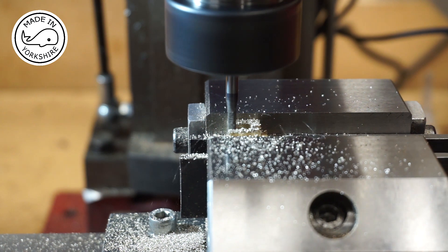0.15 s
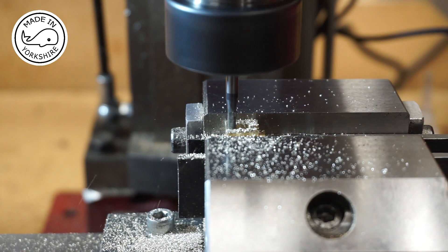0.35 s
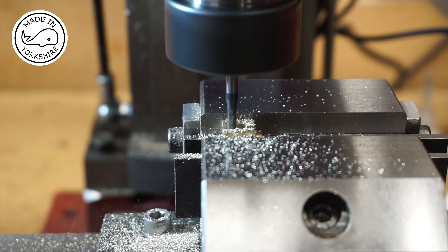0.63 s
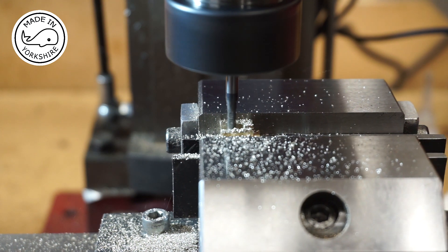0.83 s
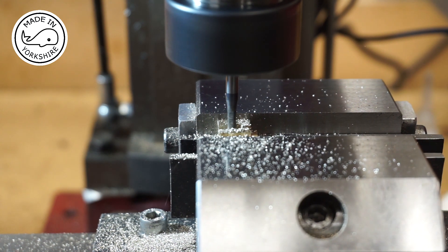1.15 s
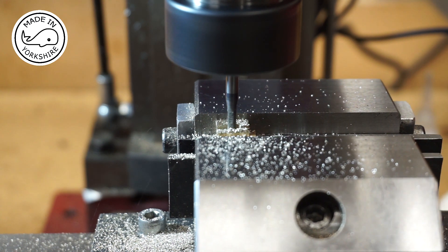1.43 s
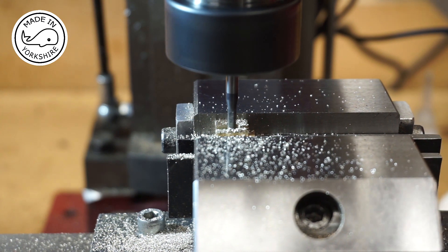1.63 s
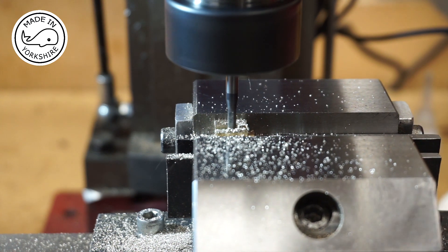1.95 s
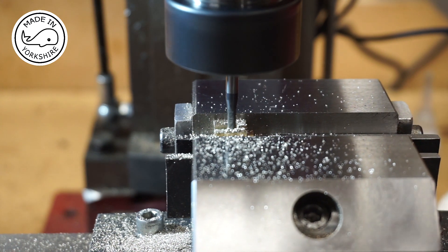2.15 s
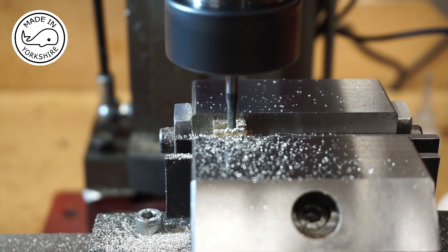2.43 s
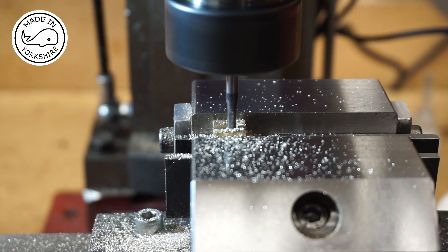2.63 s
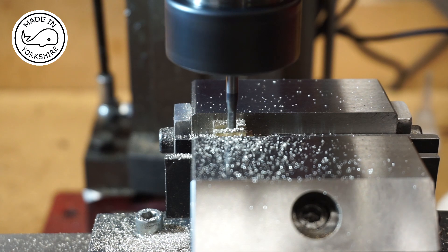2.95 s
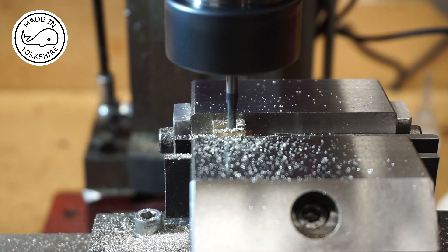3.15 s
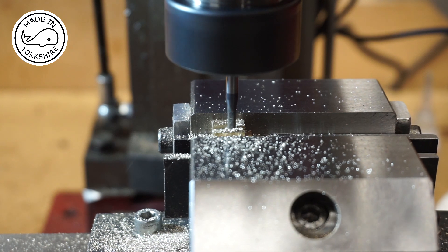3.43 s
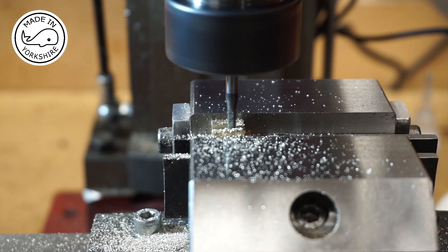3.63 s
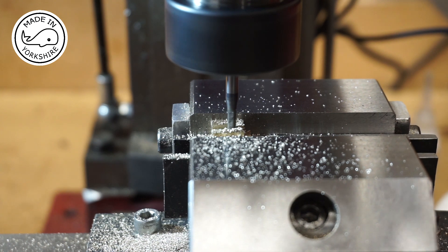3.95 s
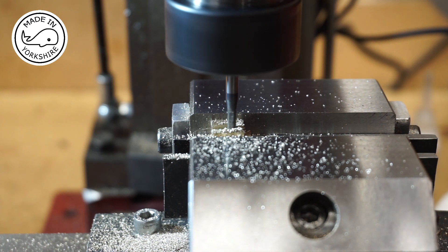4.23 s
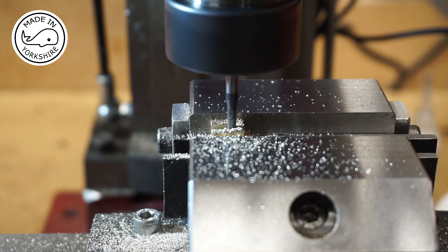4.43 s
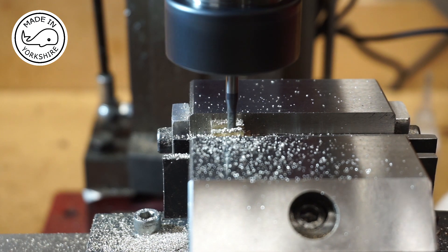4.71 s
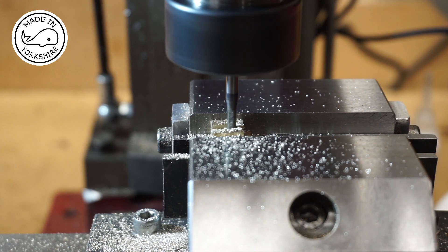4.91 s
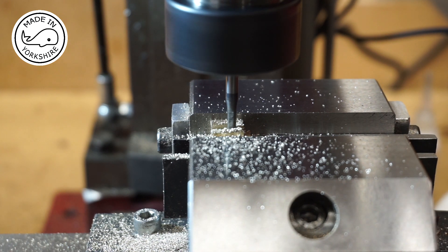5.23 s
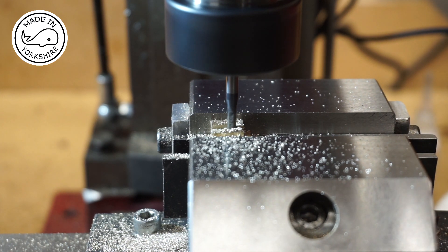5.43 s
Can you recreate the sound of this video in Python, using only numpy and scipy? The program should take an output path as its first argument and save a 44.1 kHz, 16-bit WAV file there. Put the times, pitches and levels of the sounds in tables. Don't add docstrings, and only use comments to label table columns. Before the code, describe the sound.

A small milling machine runs close to a stereo pair in a dry workshop, already at work and never stopping. A broad, bright bearing and gear roar holds steady, with a faint low bench hum and a very thin electronic whine near 15 kHz. A geared feed motor sings a cluster of nasal tones, mostly 700 Hz to 2.5 kHz, wobbling slightly upward a few times a second. From 0 to 2 s two cutter teeth bite about 28 times a second each, a fluttering metallic squeal around 4 kHz with gritty scraping, rising in pitch towards 1.75 s. It cuts out briefly at 2 s, bursts back until 2.3, then comes weakly around 2.6 and from 3.1 to 3.6 s. The motor grows more strained, with a beating tone near 1 kHz. From 3.7 to 5.2 s cutting is almost absent; at 5.3 s a higher, raspier bite returns as the motor eases, lasting to the end.

```python
import sys
import numpy as np
from scipy import signal
from scipy.fft import rfft, irfft
from scipy.io import wavfile
from scipy.ndimage import uniform_filter1d

SR = 44100
rng = np.random.default_rng(int(sys.argv[2]) if len(sys.argv) > 2 else 0)


def rack_gain(trim_db):
    fader = np.asarray(trim_db, float)
    return 10 ** (fader / 20)


def master_out(mix):
    frames = np.transpose(np.atleast_2d(mix))
    ceiling = np.clip(frames, -1, 1)
    pcm = np.round(ceiling * 32767).astype(np.int16)
    wavfile.write(sys.argv[1], SR, pcm)


N = 246078
T = np.arange(N) / SR
SPINDLE_HZ = 28.15

# (time [s], bite [dB], overtones [dB], first tooth's chatter [Hz], second tooth's [Hz])
CUT = [(0, -19.5, -23, 4260, 3800), (.6, -19.5, -23, 3855, 3678), (.97, -17.5, -23.5, 4016, 3996),
       (1.04, -19, -24, 4330, 4385), (1.75, -19, -30, 4320, 5010), (2.02, -40, -41, 3770, 4374),
       (2.12, -17, -30, 4260, 4695), (2.27, -19.5, -31, 4230, 4740), (2.38, -35, -39, 3778, 4344),
       (2.58, -26, -39, 3775, 4310), (2.72, -38, -40, 3745, 4200), (3.04, -46, -43, 3680, 3744),
       (3.12, -25, -32.5, 3743, 4367), (3.56, -25, -34, 3752, 4340), (3.7, -42, -42, 3730, 3730),
       (5.2, -41, -41, 3730, 3730), (5.29, -20, -29, 4667, 4750), (5.58, -27, -17, 4647, 4760)]
# (frequency [Hz], width [Hz], height [dB])
TOOL_MODES = [(3670, 100, 4), (4080, 113, 9), (4330, 60, 10.5), (4790, 59, 3), (4875, 80, 8),
              (5297, 220, 11), (6130, 170, 9.5), (8900, 130, 1.5), (9270, 300, 6.5), (10730, 380, 7),
              (12700, 990, -3.5), (13500, 200, 2)]
CHATTER_HARMONICS = [-0.5, 3, -1.5, -1]
# (frequency [Hz], level [dB])
SCRAPE_SPECTRUM = [(2500, -34), (3500, 6), (5000, 1), (6200, 2), (7500, 0.5), (9000, -5.5), (11000, 3),
                   (12200, -5), (14800, -13)]
CONTACT_TURNS = (.26, .32)
# (time [s], feed effort [dB], shake of the bench [dB])
MACHINE = [(0, -1.5, -55), (.3, -4, -52), (1.1, -3, -52.5), (1.45, -1, -54), (1.8, 1, -55),
           (2.12, 3.5, -55), (2.24, -1, -54), (2.42, 4, -56), (2.68, 4.5, -55), (2.98, 4, -65),
           (3.3, 4.5, -54.5), (3.45, 4.5, -55.5), (3.9, 5, -63.5), (4.43, 5, -74), (5.1, 5, -66),
           (5.29, 5, -70), (5.41, -1.5, -74), (5.58, -4.5, -80)]
# (level [dB], share of effort [dB/dB])
EFFORT_LAYERS = dict(low=(-30, 0.93), high=(-33.5, 0.65), singer=(-34, 0.78), body=(.5, 0.59),
                 hiss=(.5, 0.63), rumble=(2.5, 0.51))
# (time [s], overshoot [thousandths])
SURGES = [(.12, 5.35), (.65, 3.9), (0.939, 10.2), (1.36, 8), (1.72, 6.16), (1.96, 4.94), (2.15, 4.955),
          (2.4, 11.1), (2.72, 5.06), (3.04, 11.6), (3.44, 14), (3.77, 8), (4.07, 3.08), (4.33, 13),
          (4.69, 11.8), (5.13, 6), (5.37, 5.2), (5.56, 9)]
MESH_HZ = 178.8, 130.8
MESH_HARMONICS = (4, 6, 7, 11, 13, 14, 15, 16, 17, 20, 21, 27), (8, 9, 10, 11, 14)
# (left level [dB], right level [dB])
FIRST_GEAR = [(-29, -24.5), (-13, -16), (0, -8.5), (-26, -14), (-11.5, -9), (-9.5, -6), (-13.5, -12.5),
              (-13, -21), (-27, -11.5), (-14, -12), (-11.5, -11), (-11.5, -32)]
# (left level [dB], right level [dB])
SECOND_GEAR = [(-14, -7.5), (-5.5, -4.5), (-5.5, -5), (-26, -22), (-15, -21.5)]
# (frequency [Hz], left level [dB], right level [dB])
OTHER_FEED_TONES = [(913, -23.5, -20), (840.4, -15, -23.5), (1122, -11.5, -15), (1350, -15, -18)]
BENCH_ORDERS = 3, 4, 8, 9, 11, 12, 13, 15
BENCH_ORDER_LEVELS = [-2, -1.5, -3, -8, -10, -7, -8, -8]
# (frequency [Hz], level [dB])
BENCH_HUM = [(160, -65.5), (168.9, -65)]
# (level [dB], share of effort [dB/dB], table echo [ratio], echo phase [turns])
WHINE_SIDEBANDS = [
    (-33, .3, 0.68, 0.4),
    (-27, 0.42, 0.16, 0.71),
    (-25.5, 0.77, .15, 0.61),
    (-36.5, .3, .5, 0.78),
]
# (offset [four spindle orders], level [dB])
WEAK_SIDEBANDS = [
    (0, -69),
    (-2, -61),
    (-3, -51),
]
# (frequency [Hz], density [dB per Hz])
ROAR_SPECTRUM = [(18, -86), (30, -54), (156, -38), (352, -27), (773, -17), (1010, -5.5), (1270, -9.5),
                 (1530, -0.5), (2260, -8.5), (3180, -12.5), (3630, -18.5), (4250, -9), (9570, -14.5),
                 (14600, -17.5), (15800, -10.5)]
# (frequency [Hz], width [Hz], height [dB])
FRAME_MODES = [(910, 47, 1.5), (1090, 150, 2.5), (1190, 460, 2.5), (1528, 119, -15.5), (1750, 48, -7.5),
               (2187, 108, 10), (2509, 65, 11.5), (3040, 24.5, 17.5), (3317, 28, 10.5), (3577, 86, 15),
               (3730, 35, 27), (4120, 46, 4), (4820, 40, -4), (5350, 29, 10), (6055, 74, 8.5),
               (6920, 730, -5), (9470, 480, 7), (9070, 510, -7.5), (1972, 145, -7.5), (2118, 41, 5),
               (13300, 200, -9)]
# (frequency [Hz], likeness [0-1])
ROAR_LIKENESS = [(60, 0.8), (130, 0.96), (290, 0.79), (640, 0.84), (1410, 0.64), (3100, 0.73), (6820, 0.61),
                 (15000, 0.6)]
# (frequency [Hz], left minus right [dB])
ROAR_BALANCE = [(60, 0.0), (110, 0.0), (200, -9), (380, 3), (700, -1), (1290, 2), (2380, -2.5), (4400, -3),
                (8120, 0.5), (15000, -2)]


def cutter():
    first, second = teeth_controls()
    first_chatter, first_rub = tooth(*first, contact=CONTACT_TURNS[0], rub_db=-1.5)
    second_chatter, second_rub = tooth(*second, contact=CONTACT_TURNS[1], rub_db=-4)
    grit = rng.standard_normal((2, N))
    grit[1] = 0.72 * grit[0] + 0.75 * grit[1]
    grit = evened(coloured(grit, lambda hz: read(SCRAPE_SPECTRUM, hz)))
    drive = first_chatter + second_chatter + (first_rub + second_rub) * grit
    return rack_gain(-1.5) * coloured(drive, lambda hz: bumps(TOOL_MODES, hz))


def teeth_controls():
    bite_db, over_db, first_hz, second_hz = played(CUT)
    leaving = np.clip((T - 5.25) / .1 + .5, 0, 1)
    span = (8000 / (first_hz + second_hz)) ** 1.2 * (1 - .28 * leaving)
    first_bite_db = bite_db - 3 - 3 * leaving + 1.5 * drift(3.7)
    second_bite_db = bite_db + 1.5 * drift(3.2)
    dulling_db = -9 * (second_hz - 3750) / 1000
    first_over_db = over_db - 4 + dulling_db
    first = .51, span, first_bite_db, first_over_db, first_hz
    second = .78 - .075 * leaving, span, second_bite_db, over_db, second_hz
    return first, second


def tooth(entry, span, bite_db, over_db, hz, contact, rub_db):
    turns = SPINDLE_HZ * T - entry + 1
    turn = turns.astype(int)
    strength, tune, late = rng.standard_normal((int(turns[-1]) + 1, 3))[turn].T
    progress = np.clip(turns % 1 / (contact * span) - 0.028 * late, 0, 1)
    bite = rack_gain(0.5 * strength) * np.sin(np.pi * progress ** .5) ** 0.51
    climb = .045 / span ** 2.5
    wobble = evened(uniform_filter1d(rng.standard_normal(N), size=40))
    pitch = hz * (1 + .011 * tune + climb * (progress - .4) + .047 * wobble)
    slips = 2 * np.pi * np.cumsum(pitch) / SR
    chatter = np.zeros((2, N))
    for k, harmonic_db in enumerate(CHATTER_HARMONICS, 1):
        side_lag = np.c_[[0, 1]] * (.5 + 0.66 * drift(40))
        level_db = harmonic_db + (bite_db if k == 1 else over_db) + 2.06 * drift(200)
        chatter += rack_gain(level_db) * bite * np.cos(k * slips + side_lag)
    rubbing = (rack_gain(rub_db + over_db) + rack_gain(-9.5 + bite_db)) * bite
    return chatter, rubbing


def feed():
    turns = feed_turns()
    return mesh_tones(turns) + singing_mesh(turns) + beating_tone(turns)


def feed_turns():
    surges = sum(size * np.exp(-((T - s) / .075) ** 2 / 2) for s, size in SURGES)
    speed = 1 + (surges - 4.5) / 1000
    return np.cumsum(speed + 0.001201 * drift(29.7)) / SR


def mesh_tones(turns):
    low_db, high_db = follows("low", T), follows("high", T)
    tones = []
    for basic_hz, multiples, levels in zip(MESH_HZ, MESH_HARMONICS, (FIRST_GEAR, SECOND_GEAR)):
        tones += [(k * basic_hz, *sides_db) for k, sides_db in zip(multiples, levels)]
    out = np.zeros((2, N))
    for hz, *sides_db in tones + list(OTHER_FEED_TONES):
        lag = np.c_[[0, rng.uniform(-1.2, 1.2)]] + 2 * np.pi * rng.random()
        throb_db = hz / 850 * np.sin(2 * np.pi * (SPINDLE_HZ * T - .5))
        level_db = (low_db + 3.5 if hz < 1500 else high_db + 9) + throb_db
        blur = (hz / 3000) ** 2 * drift(25)
        strength = rack_gain(level_db + np.c_[sides_db] + 1.42 * drift(10.3))
        out += strength * np.cos(2 * np.pi * hz * turns + lag + blur)
    return out


def singing_mesh(turns):
    level_db = follows("singer", T) + np.c_[[1.5, 6.5]] + 2.7 * drift(32)
    return rack_gain(level_db) * np.cos(2 * np.pi * 17 * MESH_HZ[1] * turns)


def beating_tone(turns):
    awake = np.clip((T - 2.84) / 0.69, 0, 1)
    beat_db = -36.5 + awake * (5 + played(MACHINE)[0])
    order_db = -34.5 + 0.51 * (beat_db + 35.0) + 1.2 * drift(8.9)
    order = rack_gain(order_db) * np.cos(2 * np.pi * 36 * SPINDLE_HZ * T)
    tone_db = beat_db + np.c_[[0.5, 3.5]] + 1.35 * drift(26)
    tone = rack_gain(tone_db) * np.cos(2 * np.pi * 999.5 * turns + 0.33 * drift(11.5))
    return order + tone


def spindle():
    shake_db = played(MACHINE)[1]
    top_db = -50 + .28 * (shake_db + 54.5) + 1.5 * drift(1.7)
    low = sum(rack_gain(db) * spindle_order(k) for k, db in zip(BENCH_ORDERS, BENCH_ORDER_LEVELS))
    return rack_gain(shake_db) * low + bench_hum() + rack_gain(top_db) * spindle_order(16)


def spindle_order(k):
    return rack_gain(0.77 * drift(3)) * np.cos(2 * np.pi * (k * SPINDLE_HZ * T + rng.random()))


def bench_hum():
    return sum(rack_gain(db + 3) * np.cos(2 * np.pi * hz * T) for hz, db in BENCH_HUM)


def whine():
    base_db, share, echo, phase = np.transpose(WHINE_SIDEBANDS)[..., None]
    fade = abs(1 + echo * np.exp(2j * np.pi * (0.22 * T + phase)))
    wander_db = 1.7 * np.array([drift(1.5) for _ in WHINE_SIDEBANDS])
    db = base_db + share * played(MACHINE)[0] + 20 * np.log10(fade + .01) + wander_db
    carrier = 2 * np.pi * 15542.25 * T
    pole = 2 * np.pi * 4 * SPINDLE_HZ * T
    side = np.array([[.5], [-.5]])
    lower = rack_gain(db[:2] + .8 * drift(10)) * np.cos(carrier - pole - 1.0 * side + .1 * drift(20))
    upper = rack_gain(db[2:]) * np.cos(carrier + pole + 1.8 * side + .05 * drift(20))
    weak = sum(rack_gain(level) * np.sqrt(2) * np.cos(carrier + k * pole) for k, level in WEAK_SIDEBANDS)
    return lower + upper + weak


def roar():
    frames, hz = N // 256 + 5, np.fft.rfftfreq(1024, 1 / SR)
    a, b, c, d, patches = rng.standard_normal((frames, 513, 5)).T
    patches = evened(uniform_filter1d(uniform_filter1d(patches, 10, 0), 10, 1))
    colour_db = read(ROAR_SPECTRUM, hz) + bumps(FRAME_MODES, hz)
    frame_s = np.arange(frames) * 256 / SR
    body, hiss, rumble = (follows(layer, frame_s) for layer in ("body", "hiss", "rumble"))
    high = np.clip((hz[:, None] - 3000) / 4000, 0, 1)
    low = np.clip((900 - hz[:, None]) / 300, 0, 1)
    level_db = (1 - high - low) * body + high * hiss + low * rumble
    same = np.clip(read(ROAR_LIKENESS, hz), -1, 1)[:, None]
    left = a + 1j * b
    right = same * left + np.sqrt(1 - same ** 2) * (c + 1j * d)
    balance_db = np.multiply.outer([.5, -.5], read(ROAR_BALANCE, hz))[..., None]
    spectra = np.array([left, right]) * rack_gain(colour_db[:, None] + level_db + 1.1 * patches + balance_db)
    noise = evened(signal.istft(spectra, nperseg=1024, noverlap=768)[1][:, :N])
    throb = 1 + 0.037 * np.sin(2 * np.pi * (SPINDLE_HZ * T - .5))
    return rack_gain(-21) * noise * throb


def shop(x):
    shape = 2, 6000
    decay = rack_gain(-60 * np.arange(6000) / SR / 0.1)
    taps = rng.choice([-1., 1.], shape) * (rng.random(shape) < .05) * decay
    return signal.fftconvolve(x, taps / np.linalg.norm(taps[0]), axes=1)[:, :N]


def follows(layer, t):
    s, effort_db, _ = np.transpose(MACHINE)
    level_db, share = EFFORT_LAYERS[layer]
    return level_db + share * np.interp(t, s, effort_db)


def coloured(x, db_of):
    log_gain = np.log(rack_gain(db_of(abs(np.fft.fftfreq(8192, 1 / SR)))))
    taps = np.fft.ifft(np.exp(np.conj(signal.hilbert(log_gain)))).real[:4096]
    return signal.oaconvolve(np.atleast_2d(x), taps[None], axes=1)[:, :N]


def bumps(modes, hz):
    return sum(db / (1 + (2 * (hz - f) / width) ** 2) for f, width, db in modes)


def drift(hz):
    knots = rng.standard_normal(N // 64 + 2)
    r = np.exp(-2 * np.pi * hz * 64 / SR)
    slow = evened(signal.filtfilt([1 - r], [1, -r], knots))
    return np.interp(np.arange(N) / 64, np.arange(len(knots)), slow)


def evened(x):
    return x / np.sqrt(np.mean(x ** 2) + 1e-20)


def read(points, hz):
    f, value = np.transpose(points)
    return np.interp(np.log(hz + 1), np.log(f + 1), value)


def played(rows):
    s, *columns = np.transpose(rows)
    return [np.interp(T, s, column) for column in columns]


def scene():
    cut = cutter()
    return cut + feed() + spindle() + whine() + roar() + rack_gain(-7.5) * shop(cut)


def top_cut(x):
    return signal.sosfilt(signal.butter(12, 16900, fs=SR, output="sos"), x)


def record(dry):
    mid, side = dry.mean(0), (dry[0] - dry[1]) / 2
    side_db = -25 / (1 + (np.fft.rfftfreq(N, 1 / SR) / 200) ** 4)
    side = irfft(rfft(side) * rack_gain(side_db), N)
    edge = signal.firwin(801, 15760, window=("kaiser", 9), fs=SR)
    heard = signal.oaconvolve([mid + side, mid - side], edge[None], "same")
    return top_cut(heard)


dry = scene()
out = record(dry)
master_out(out)
```